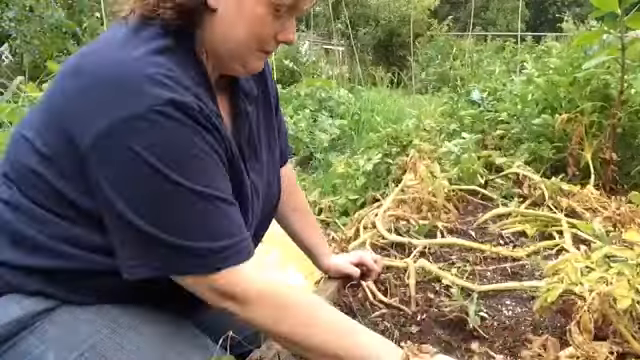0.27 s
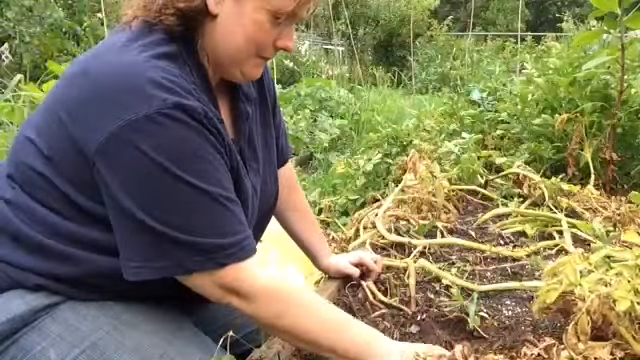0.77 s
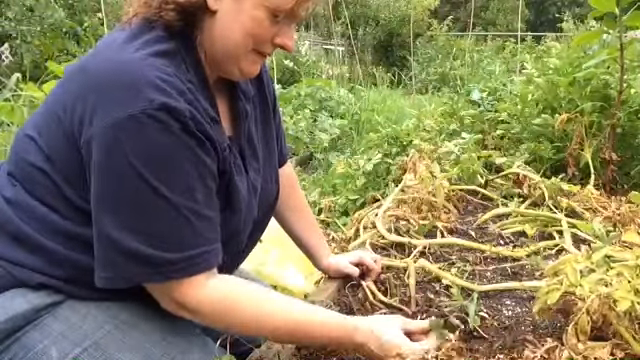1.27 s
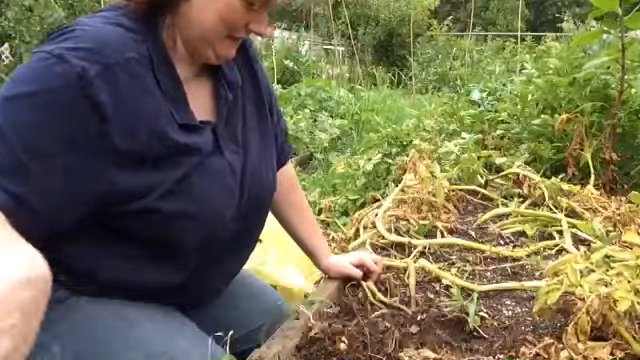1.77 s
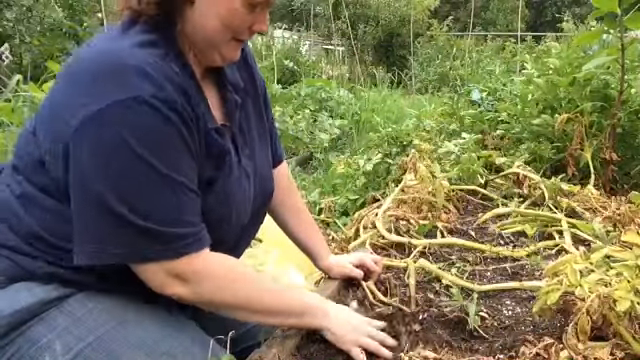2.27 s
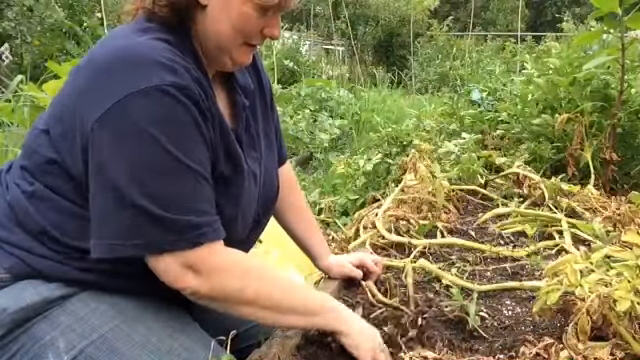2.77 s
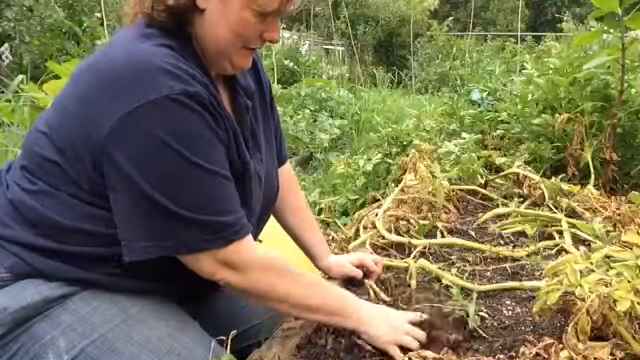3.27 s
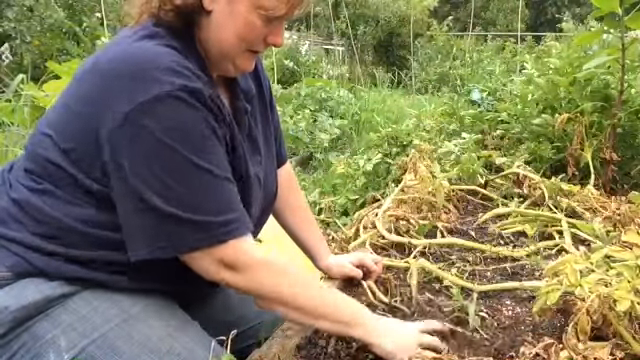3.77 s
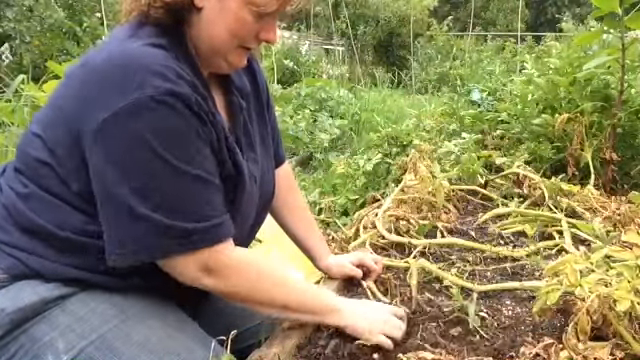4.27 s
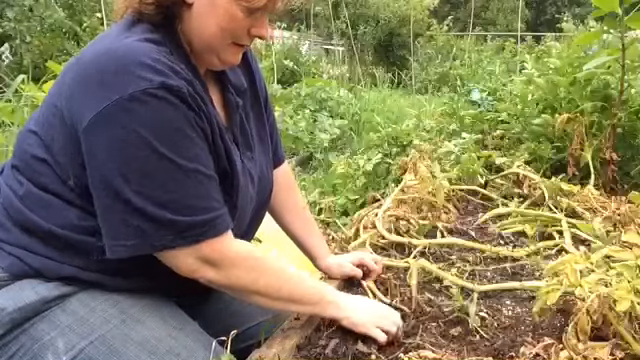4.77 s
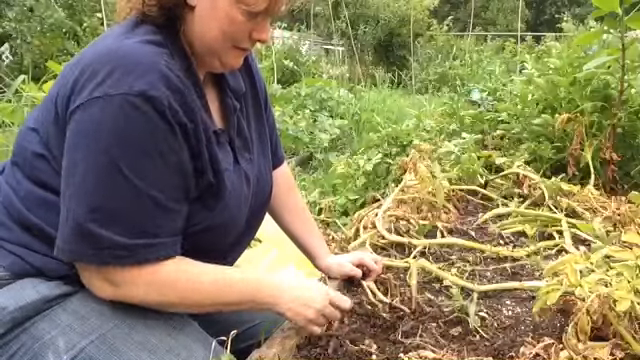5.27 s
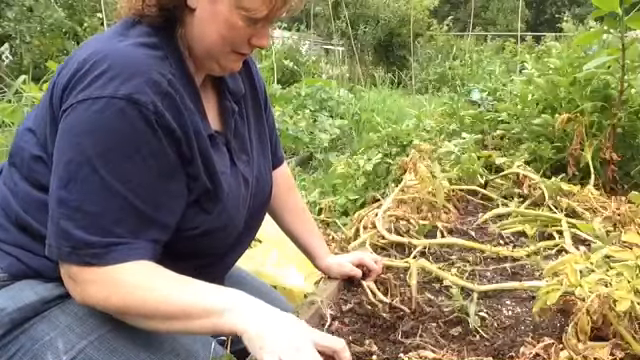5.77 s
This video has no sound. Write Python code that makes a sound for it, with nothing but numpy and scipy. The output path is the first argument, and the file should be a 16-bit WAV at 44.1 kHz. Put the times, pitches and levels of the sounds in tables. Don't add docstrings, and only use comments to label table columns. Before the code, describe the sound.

Hollow plastic knocks and crisp rustling at the start quickly settle into quiet garden air, with faint leaf scuffs, tiny snaps and far birds.

```python
import sys
import numpy as np
from scipy import signal
from scipy.fft import rfft, irfft, next_fast_len
from scipy.io import wavfile
from scipy.ndimage import uniform_filter1d, map_coordinates

SR = 44100
rng = np.random.default_rng(int(sys.argv[2]) if len(sys.argv) > 2 else 0)


def wrap_up_sound(samples):
    columns = np.atleast_2d(samples).T
    tamed = np.clip(columns, -1, 1)
    steps = np.round(tamed * 32767).astype(np.int16)
    wavfile.write(sys.argv[1], SR, steps)


def elevation(decibels):
    levels = np.asarray(decibels, float)
    return 10 ** (levels / 20)


N = 264688


def unit(x):
    return x / np.sqrt(np.mean(x ** 2) + 1e-20)


def along(points, hz):
    f, v = np.transpose(points)
    return np.interp(np.log(hz + 1), np.log(f + 1), v)


def level_curve(points):
    s, db = np.transpose(points)
    return np.interp(np.arange(N) / SR, s, db)


def wobble(rate, size=N):
    knots = rng.standard_normal(int(size * rate / SR) + 4)
    return map_coordinates(knots, [np.arange(size) * rate / SR])


def filtered(x, response):
    m = next_fast_len(N + SR // 2)
    return irfft(rfft(x, m) * response(np.fft.rfftfreq(m, 1 / SR)), m)[..., :N]


def coloured(x, spectrum):
    return unit(filtered(x, lambda hz: elevation(along(spectrum, hz))))


# time in seconds, level in dB.
TRAFFIC_LEVEL = [(0.8, -57.5), (1.38, -56), (1.91, -60), (2.36, -57.5), (4.29, -56.5), (4.43, -54.5),
                 (6.0, -58.5)]
# frequency in Hz, level in dB per Hz.
TRAFFIC_COLOUR = [(13, -61.5), (28, -31), (40, -19), (55, -1.5), (112, 0), (141, -7.5), (320, -27),
                  (420, -43.5), (700, -120)]
# time in seconds, level in dB.
HUSH_LEVEL = [(0, -61.5), (1, -63), (2, -63.5), (2.9, -62), (3.5, -63), (4.2, -63), (6, -64)]
# frequency in Hz, level in dB per Hz.
HUSH_COLOUR = [(150, -11.5), (250, -4), (400, 0), (800, -3.5), (1250, -7), (3000, -9), (8500, -13),
               (12000, -18.5), (14500, -26.5), (15800, -31)]


def garden():
    surge_db = -0.5 * wobble(8.2)
    rumble_gain = elevation(level_curve(TRAFFIC_LEVEL) + 1.8 + surge_db)
    rumble = rumble_gain * coloured(rng.standard_normal(N), TRAFFIC_COLOUR)
    hush_gain = elevation(level_curve(HUSH_LEVEL) + wobble(8) / 4)
    return rumble + hush_gain * coloured(rng.standard_normal(N), HUSH_COLOUR)


def strands(table, shape, ratio=1, share=1, gain_db=0):
    return [(s, share * length, *(ratio * hz * np.array(shape)), db + gain_db)
            for s, length, hz, db in table]


def whistle(table, waver, rate, third=0):
    out = np.zeros(N + SR)
    for s, length, start_hz, mid_hz, end_hz, db in table:
        u = np.arange(round(length * SR)) / (length * SR)
        glide = start_hz * (1 - u) * (1 - 2 * u) + 4 * mid_hz * u * (1 - u) + end_hz * u * (2 * u - 1)
        pitch = glide * (1 + waver * wobble(rate, size=SR)[:len(u)])
        phase = 2 * np.pi * np.cumsum(pitch) / SR
        octave = elevation(-14) * (mid_hz / 7000) ** 3 * np.sin(2 * phase)
        voice = np.sin(phase) + octave + third * np.sin(3 * phase)
        out[round(s * SR):][:len(u)] += elevation(db + 4.5) * np.sqrt(np.sin(np.pi * u)) * voice
    return out[:N]


def echoes(x, t60):
    tail = rng.standard_normal(SR // 2) * elevation(-60 * np.arange(SR // 2) / SR / t60)
    return signal.fftconvolve(x, tail / np.linalg.norm(tail))[:N]


# start in seconds, length in seconds, pitch in Hz, level in dB.
CHIRP_NOTES = [
    (1.439, 0.049, 7125, -62),
    (3.332, 0.043, 7330, -59),
    (3.454, 0.042, 7083, -65),
    (5.584, 0.0488, 7230, -60.5),
]
# start in seconds, length in seconds, top pitch in Hz, level in dB.
ARCHED_NOTES = [
    (3.224, .098, 3293, -61),
    (4.406, 0.049, 3683, -69),
]


def near_birds():
    chirp = (.86, 1, 1.02)
    chirps = strands(CHIRP_NOTES, chirp) + strands(CHIRP_NOTES, chirp, ratio=.9, gain_db=-5)
    arches = strands(ARCHED_NOTES, (.76, 1, .8))
    return whistle(chirps, waver=.04, rate=500) + whistle(arches, waver=.035, rate=700)


# start in seconds, length in seconds, start pitch in Hz, level in dB.
FALLING_PHRASES = [
    (2.6, .36, 3979, -72.5),
    (4.675, .42, 3750, -74),
]
# start in seconds,
# length in seconds, start and end pitch in Hz, level in dB.
BUZZY_NOTES = [(0.879, 0.0906, 4260, 4366, -67.5), (1.353, 0.065, 5693, 5537, -67.5),
               (1.387, 0.06, 4175, 4720, -66.5), (1.889, .11, 5607, 6250, -70),
               (2.14, 0.117, 4550, 5195, -74), (2.512, .12, 3347, 3302, -69), (2.59, .1, 4450, 4150, -68),
               (2.63, .15, 3539, 3311, -64.5), (4.718, .11, 3492, 3330, -69.5),
               (3.543, 0.053, 6400, 5990, -64.5), (3.557, .05, 5060, 5006, -72.5)]
# start in seconds, length in seconds, pitch in Hz, level in dB.
HOARSE_CALLS = [
    (3.35, 0.14, 653.6, -64),
]


def far_birds():
    buzzes = [(s, length, a, (a + b) / 2, b, db) for s, length, a, b, db in BUZZY_NOTES]
    fall = (1, .745, .68)
    phrases = strands(FALLING_PHRASES, fall)
    phrases += strands(FALLING_PHRASES, fall, ratio=1.15, share=.72, gain_db=-1)
    notes = whistle(buzzes, waver=.055, rate=300) + whistle(phrases, waver=.03, rate=300)
    calls = whistle(strands(HOARSE_CALLS, (1, 1, 1)), waver=0.1417, rate=110, third=0.33)
    return notes * elevation(2 * wobble(90)) + calls


def birds():
    near, far = near_birds(), far_birds()
    return .75 * near + .65 * echoes(near, .2) + .5 * far + .85 * echoes(far, .2)


def bursts(table, shape):
    size = 4096
    out, t = np.zeros(N + size), np.arange(size) / SR
    f = np.fft.rfftfreq(size, 1 / SR)
    for s, db, hz, spread, breadth in table:
        burst = np.append(3, rng.standard_normal(size - 1)) * shape(t / spread)
        resonance = 1j * f * hz / (hz * hz - f * f + 1j * f * hz * breadth)
        burst = irfft(rfft(burst) * resonance)
        out[round(s * SR):][:size] += elevation(db) * burst / np.abs(burst).max()
    return out[:N]


# time in seconds, peak in dB, spread in seconds.
LEAF_SCUFFS = [(.76, -51.5, 0.0174), (.86, -54.5, 0.018), (1.10, -47, 0.0221), (1.20, -48, 0.0183),
               (1.30, -54, 0.008), (1.57, -62.5, 0.0144), (1.605, -55, 0.012), (1.81, -53.5, 0.0132),
               (2.065, -58, .011), (2.77, -56.5, .012), (3.01, -53, 0.0127), (3.205, -52, 0.0218),
               (3.515, -51.5, 0.012), (3.985, -57, 0.0136), (4.32, -56, 0.0213), (4.89, -59, .02)]


def scuffs():
    rows = [(s, db, 11500, spread, .85) for s, db, spread in LEAF_SCUFFS]
    swells = bursts(rows, lambda u: np.exp(-(u - 1.5) ** 2))
    return np.roll(swells, -round(0.02 * SR))


# time in seconds, peak in dB, centre in Hz.
STEM_SNAPS = [(0.23, -37, 4550), (0.2679, -50.5, 11600), (0.2809, -27, 11800), (0.3457, -28, 9000),
              (0.351, -29.5, 5200), (0.3596, -33, 4850), (0.3914, -37, 9030), (0.424, -28.5, 7650),
              (0.4898, -33.5, 13500), (0.532, -45.5, 4420), (0.85, -44.5, 6750), (1.0315, -45, 9270),
              (1.076, -37, 9500), (1.0957, -44.5, 10900), (1.1028, -51.5, 9710), (1.1164, -41.5, 10900),
              (1.1683, -43, 10770), (1.197, -42.5, 9840), (2.918, -41.5, 12200), (2.956, -40, 12200),
              (4.313, -43, 5400), (0.683, -37, 11500), (0.3245, -39, 8000)]
# time in seconds, peak in dB, centre in Hz, decay in seconds,
# width over centre as a ratio.
TWIG_CRACKS = [
    (0.3062, -32, 3240, 0.00255, 0.355),
    (1.047, -35.5, 6000, 0.00102, 3.7),
    (2.955, -39, 2600, 0.00064, 1.06),
    (5.046, -41.5, 2600, 0.00075, 0.84),
    (5.0461, -37.5, 10000, .0004, 1.13),
]


def snaps():
    stems = [(s, db, hz, 0.00121, 0.56) for s, db, hz in STEM_SNAPS]
    return 1.065 * bursts(stems + list(TWIG_CRACKS), lambda u: np.exp(-u))


# peak time in seconds, level in dB,
# rise in seconds per 10 dB, fade in seconds per 10 dB.
HAND_STROKES = [(.235, -52, 0.018, 0.0866), (.286, -48, 0.055, .06), (.349, -38.5, 0.0253, 0.0494),
                (.446, -40.5, 0.0266, 0.0694), (.56, -54.5, 0.054, 0.2258), (.84, -69.5, 0.104, 0.57),
                (1.11, -73.5, 0.23, 0.25), (1.21, -65.5, 0.079, 0.5148), (1.47, -63.5, 0.198, 0.0158),
                (1.565, -62, 0.0345, 0.09), (1.81, -74.5, .022, 1.4), (2.06, -73, 0.0125, -0.28),
                (2.32, -66, 0.034, 0.3), (2.8, -64.5, 0.26, 0.04), (2.95, -63, 0.154, 0.2658),
                (3.22, -65, 0.051, 0.65), (3.515, -65.5, 0.24, 0.3261), (3.6, -77.5, 0.092, 2.3),
                (4.89, -74.5, 0.2, 1.1)]


def effort():
    t = np.arange(N) / SR
    power = np.zeros(N)
    for s, db, rise, fade in HAND_STROKES:
        tens_down = np.where(t < s, (s - t) / abs(rise), (t - s) / abs(fade))
        power += elevation(2 * (db - 10 * tens_down))
    return 10 * np.log10(power + 1e-12)


def patchy(x, depth_db):
    z = signal.stft(x, nperseg=256)[2]
    field = uniform_filter1d(rng.standard_normal(z.shape), 9, axis=0)
    field = uniform_filter1d(field, 5, axis=1)
    return signal.istft(z * elevation(depth_db * unit(field)), nperseg=256)[1][:N]


# frequency in Hz, level in dB per Hz.
BRUSHING_COLOUR = [(900, -120), (1800, -20.5), (3300, -3.5), (6000, -4), (10000, -1), (14000, -4),
                   (16300, -9.5)]
# frequency in Hz, level in dB per Hz.
CRUMPLING_COLOUR = [(710, -14), (1200, 5), (2660, 0.5), (3160, 3), (4940, 5), (9500, -5.5), (14400, -4.5),
                    (16200, -32.5)]


def rubbing():
    level_db = effort()
    firm = np.clip(.27 + .002 * (level_db + 50), 0, 1)
    clicks = rng.random(N) < 2500 / SR
    clicks = clicks * elevation(2.25 * np.minimum(rng.exponential(size=N), 4)) * rng.choice([-1, 1], N)
    grit = patchy(unit(clicks) + rng.standard_normal(N), depth_db=1.91)
    clumps = unit(elevation(1.8 * wobble(120) + .6 * wobble(25)))
    brushing = (1 - firm) * coloured(grit, BRUSHING_COLOUR)
    crumpling = firm * coloured(grit, CRUMPLING_COLOUR)
    return elevation(level_db + 1.5) * clumps * (brushing + crumpling)


# time in seconds, peak in dB, ring in Hz, 60 dB decay in seconds.
CLOD_TAPS = [
    (.1165, -36, 880, 0.0257),
    (.127, -42, 731, 0.035),
    (.282, -45.5, 814, 0.06),
    (.746, -52, 660, 0.029),
]


def clods():
    out, t = np.zeros(N), np.arange(SR // 8) / SR
    for s, db, hz, t60 in CLOD_TAPS:
        soft_start = 1 - np.exp(-t / 0.0012)
        out[round(s * SR):][:len(t)] += elevation(db - 60 * t / t60) * soft_start * np.sin(2 * np.pi * hz * t)
    return out


def modes(table, f):
    return sum(elevation(db) * hz / (hz * hz - f * f + 1j * f * width) for hz, width, db in table)


# time in seconds, strength in dB, nearness to the wall in dB, hardness in dB.
TUBER_BOUNCES = [(0.064, -23.5, .5, -4), (0.079, -21, -7.5, -18.5), (0.115, -40.5, -24.5, -4),
                 (0.139, -46, -20, -21.5), (0.306, -20.5, -10.5, -10.5), (0.32, -42, 2.5, -2.5),
                 (0.404, -42, 16, 3), (0.418, -28, -32.5, -26), (0.476, -37, 4, -4.5),
                 (0.515, -43, 2, -6.5), (0.554, -49.5, 9, -2.5), (0.58, -39, -8, -23),
                 (0.592, -46.5, 12, -24), (0.626, -41.5, 6, -7), (0.657, -44, 4, -4),
                 (0.687, -51, 9.5, -12.5), (0.716, -55, 9.5, -10), (0.744, -60, 11, -16.5),
                 (1.133, -62, 15, -8), (1.213, -50, 3, -3.5)]
# frequency in Hz, width in Hz, level in dB.
WALL_MODES = [(95.14, 14.26, 2.5), (116, 38, -9)]
# frequency in Hz, width in Hz, level in dB.
BASE_MODES = [(187.9, 26, -1), (222.2, 32.3, -1), (369.3, 30.5, -9), (425, 64.4, -5)]
# frequency in Hz, width in Hz, level in dB.
EDGE_MODES = [(468.2, 97, 10), (575, 59, -0.5), (689.8, 54.7, -3), (783, 92, -9), (983.6, 88, -2),
              (1144, 122, -1.5), (1716, 210, -0.5), (2300, 630, -24.5)]


def tub():
    f, t = np.fft.rfftfreq(SR // 2, 1 / SR), np.arange(SR // 2) / SR
    soft = 1 / (1 + 1j * f / 650) ** 2
    skin_hz = 512
    hard = 1j * f * skin_hz / (skin_hz ** 2 - f * f + 1j * f * skin_hz * 1.716)
    hard /= 1 + 1j * f / (11 * skin_hz)
    radiation = ((1j * f) ** 2 / (62 ** 2 - f * f + 1j * f * 62 * 1.37)) ** 2
    choke = np.exp(-(t / 0.064) ** 2)
    out, last = np.zeros(N + SR), -1
    for s, db, wall_db, edge_db in TUBER_BOUNCES:
        edge = [(hz, width, level + 2 * rng.normal()) for hz, width, level in EDGE_MODES]
        ring = soft * (elevation(wall_db + 77.5) * modes(WALL_MODES, f) + elevation(78.5) * modes(BASE_MODES, f))
        ring = ring + hard * elevation(edge_db + 79.5) * modes(edge, f)
        push = -1 if s - last < .02 else 1
        knock = irfft(ring * radiation) * choke
        out[round((s + .0012) * SR):][:len(t)] += push * elevation(db) * knock
        last = s
    return out[:N]


def scene():
    return (garden() + birds() + rubbing() + scuffs() + snaps() + clods() + tub())[None]


def top_cut(x):
    return signal.sosfilt(signal.butter(12, 16360, fs=SR, output="sos"), x)


def record(dry):
    mix = filtered(dry, lambda hz: hz < 15830)
    return top_cut(mix)


dry = scene()
out = record(dry)
wrap_up_sound(out)
```